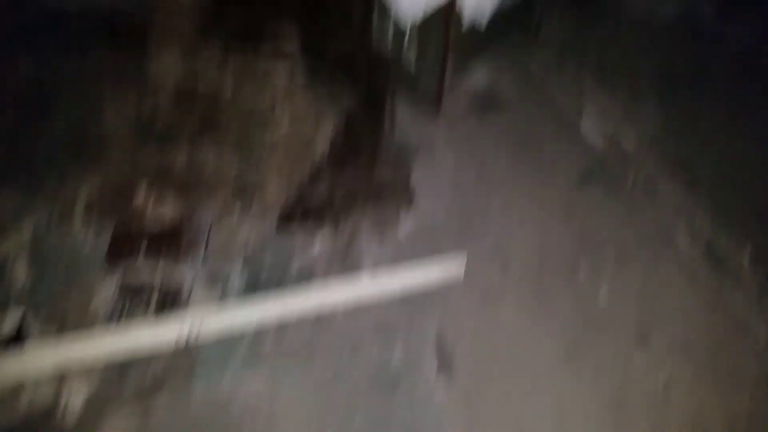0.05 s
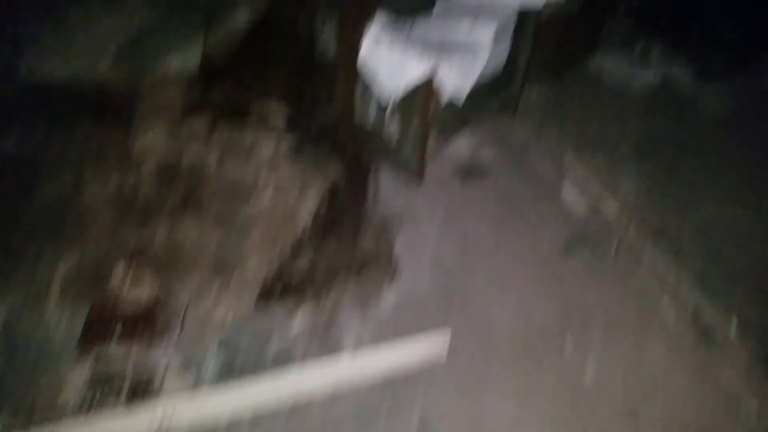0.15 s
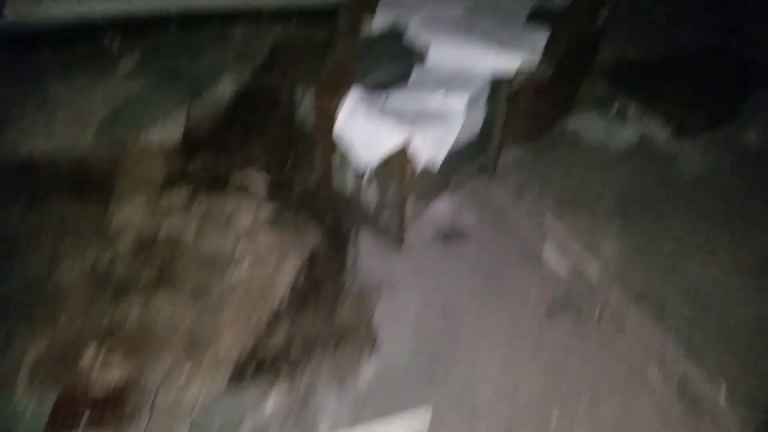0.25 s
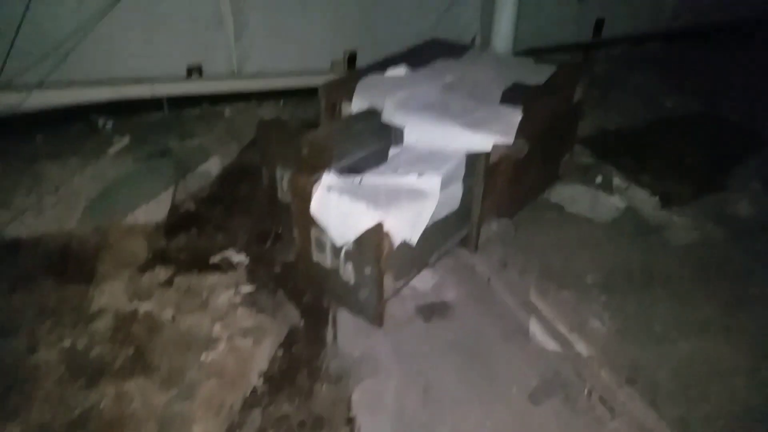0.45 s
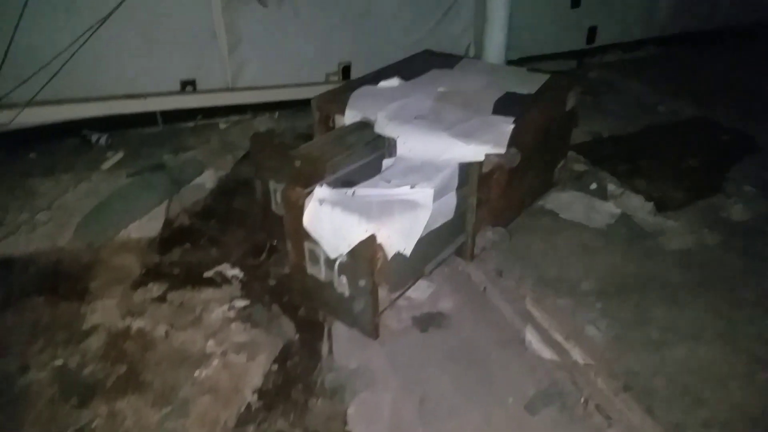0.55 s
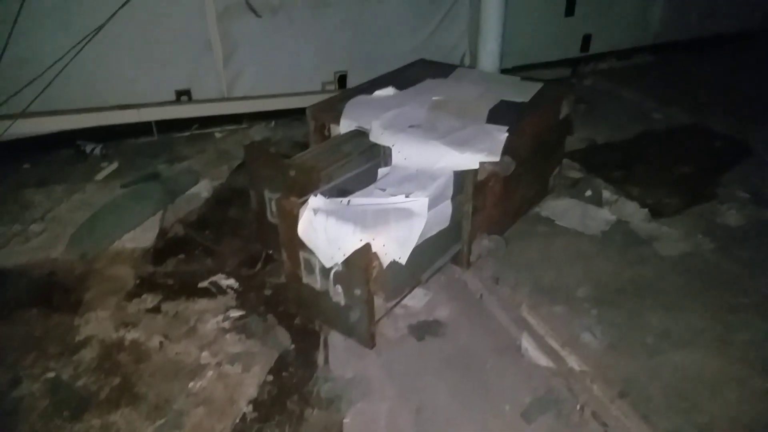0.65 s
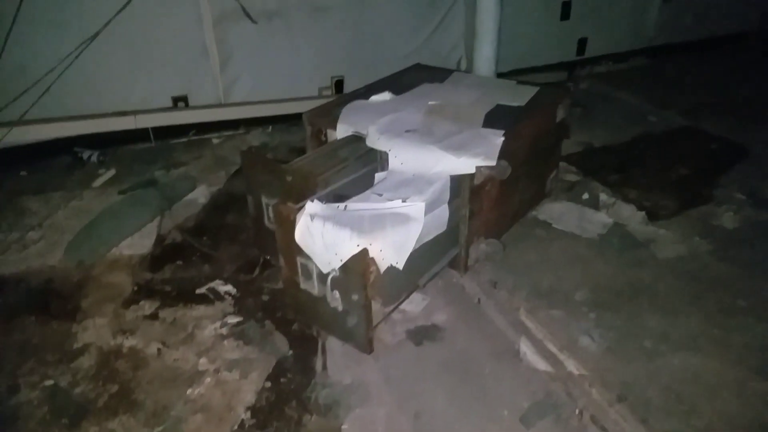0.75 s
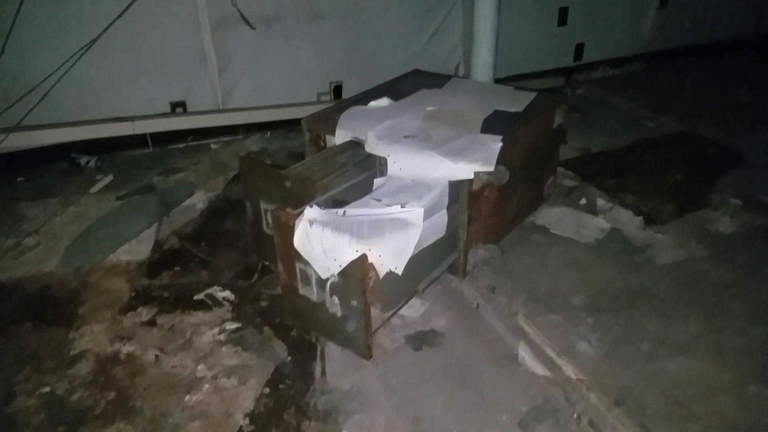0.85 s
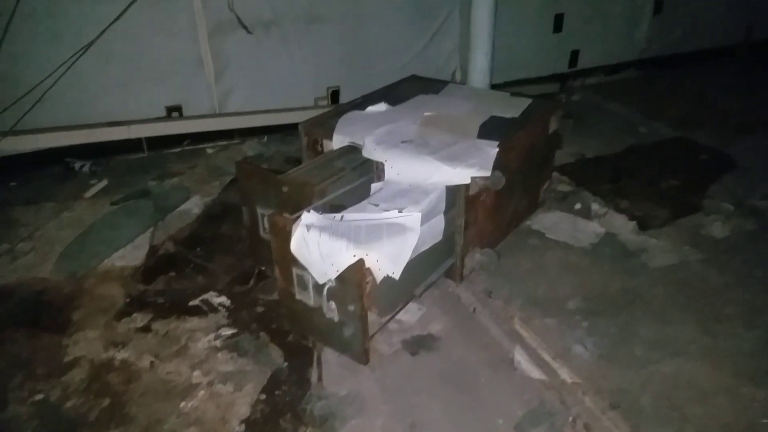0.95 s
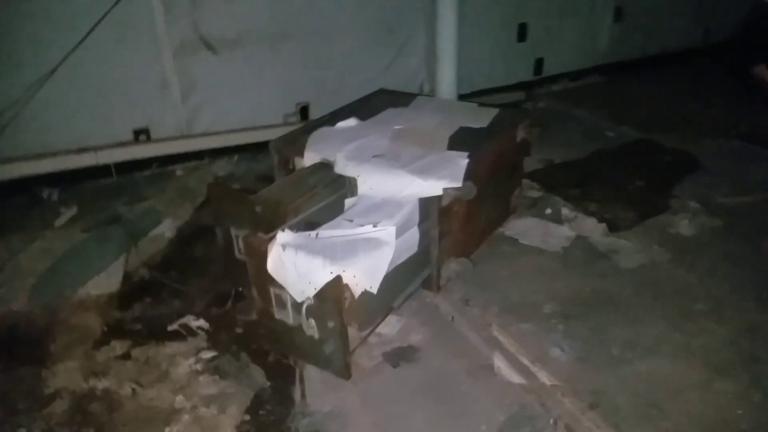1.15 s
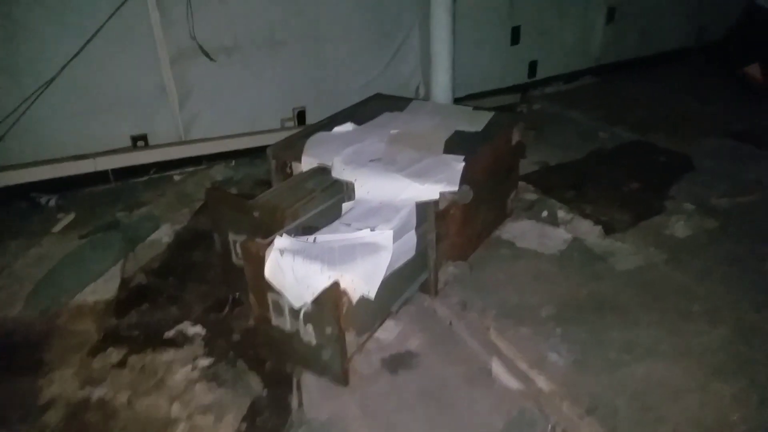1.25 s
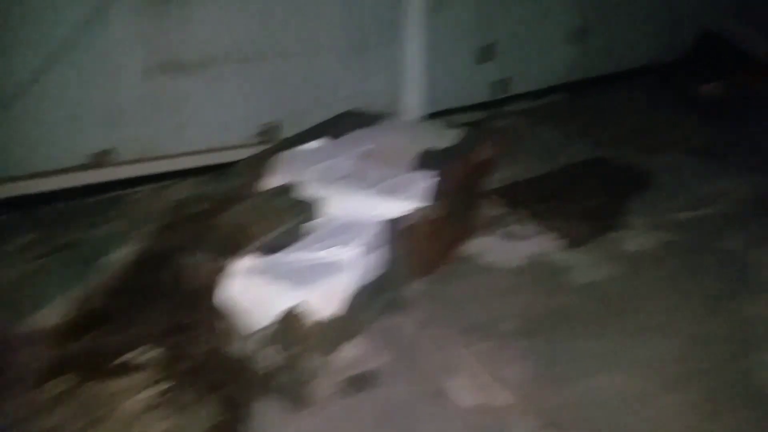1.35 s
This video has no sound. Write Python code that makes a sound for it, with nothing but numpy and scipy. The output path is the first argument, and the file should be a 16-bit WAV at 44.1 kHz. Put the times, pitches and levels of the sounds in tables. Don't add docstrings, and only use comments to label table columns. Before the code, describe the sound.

One footstep crushes brittle shards on concrete with sharp cracks and a short gritty scrape, echoing through a bare hall; sparse ticks follow over low hum and hiss, with a late handling tap and rub on the left.

```python
import sys
import numpy as np
from scipy import signal
from scipy.fft import rfft, irfft
from scipy.io import wavfile
from scipy.ndimage import uniform_filter1d

SR = 44100
rng = np.random.default_rng(int(sys.argv[2]) if len(sys.argv) > 2 else 0)


def to_linear_factor(level_db):
    exponent = np.asarray(level_db, float) / 20
    return 10 ** exponent


def store_pcm(level_fs):
    pcm = np.round(np.clip(level_fs, -1, 1) * 32767).astype(np.int16)
    wavfile.write(sys.argv[1], SR, np.atleast_2d(pcm).T)


N = 61739


def evened(x):
    return x / np.sqrt(np.mean(x ** 2) + 1e-20)


def read(points, hz):
    f, value = np.transpose(points)
    return np.interp(np.log(hz + 1), np.log(f + 1), value)


def add(mix, s, sound):
    part = mix[..., round(s * SR):][..., :sound.shape[-1]]
    part += sound[..., :part.shape[-1]]


def coloured(x, points, tilt_db=0.):
    hz = np.fft.rfftfreq(x.shape[-1], 1 / SR)
    gain_db = read(points, hz) + tilt_db * np.log2(hz / 3000 + 0.043)
    return irfft(rfft(x) * to_linear_factor(gain_db), x.shape[-1])


def resonate(x, hz, width_hz):
    return signal.lfilter(*signal.iirpeak(hz, hz / width_hz, SR), x)


def steep(x, hz, width_hz):
    return evened(resonate(resonate(x, hz, width_hz), hz, width_hz))


def below(x, edge_hz):
    lowpass = signal.firwin(255, edge_hz, window=("kaiser", 9), fs=SR)
    return signal.oaconvolve(x, lowpass[None], "same")


def above(x, order, edge_hz):
    return signal.sosfilt(signal.butter(order, edge_hz, "high", fs=SR, output="sos"), x)


def placed(x, pan_db, lag_s):
    hz = np.fft.rfftfreq(x.shape[-1], 1 / SR)
    side = np.array([[1.], [-1.]])
    turn = np.exp(-1j * np.pi * hz * lag_s * side)
    return irfft(rfft(x) * turn, x.shape[-1]) * to_linear_factor(np.minimum(side * pan_db, 0))


def pair(same, size):
    a, b = rng.standard_normal((2, size))
    same = np.clip(same, 0, 1)
    return np.array([a, same * a + np.sqrt(1 - same ** 2) * b])


def ring(s, db, hz, ring_s):
    t = np.maximum(np.arange(N) / SR - s, 0)
    return to_linear_factor(db) * t / ring_s * np.exp(1 - t / ring_s) * np.sin(2 * np.pi * hz * t)


def air():
    # f/Hz, level/dB
    spectrum = [(12, -56), (20, -18.5), (305, -13), (440, -12.5), (994, -22), (2060, -16.5), (2660, -26),
                (14700, -38), (16500, -41)]
    # f/Hz, likeness/1
    likeness = [(60, 0.94), (180, 0.92), (550, 0.55), (1650, -0.22), (4970, -0.022), (15000, -0.014)]
    # f/Hz, left over right/dB
    balance = [(60, 8), (380, -1), (2380, 8.5), (15000, -2)]
    # f/Hz, width/Hz, level/dB
    hum = [(53, 31, -67.5), (99.2, 14.6, -67.5), (142, 8.8, -77.5), (328, 13, -74)]
    hz = np.fft.rfftfreq(N, 1 / SR)
    a, b = rfft(rng.standard_normal((2, N)))
    same = np.clip(read(likeness, hz), 0, 1)
    half_pan_db = read(balance, hz) / 2
    left = a * to_linear_factor(half_pan_db)
    right = (same * a + np.sqrt(1 - same ** 2) * b) * to_linear_factor(-half_pan_db)
    out = to_linear_factor(-58.5) * evened(irfft(np.array([left, right]) * to_linear_factor(read(spectrum, hz)), N))

    calm_db = -3 * np.clip((np.arange(N) / SR - 0.46) / 0.056, 0, 1)
    for f, width_hz, db in hum:
        level_db = db + calm_db * (f == hum[1][0])
        out = out + to_linear_factor(level_db) * steep(pair(0.97, N), f, width_hz)
    return out + to_linear_factor(-68) * steep(pair(0.71, N), 1920, 1070)


def earlier_step():
    # f/Hz, level/dB
    spectrum = [(59, -32), (100, -11), (595, -8), (801, -12.5), (1720, -14.5), (1870, -13), (2040, -12.5),
                (2470, -18.5), (16000, -48.5)]
    level_db, t60_s, pan_db = -47.5, 0.73, 0.5
    fade = to_linear_factor(level_db - 60 * np.arange(N) / SR / t60_s)
    return placed(evened(coloured(pair(0.4, N), spectrum)) * fade, pan_db, 0)


def grit():
    grains_per_s, level_db, spread_db = 120, -72.5, 7
    size = to_linear_factor(level_db + spread_db * np.minimum(rng.exponential(1, N), 2))
    size = size * (rng.random(N) < grains_per_s / SR)
    kind = rng.integers(0, 8, N)
    out = np.zeros((2, N))
    for k, hz in enumerate(np.geomspace(700, 7000, 8)):
        sides = to_linear_factor(np.array([[3.], [-3.]]) * (-1) ** k)
        out += resonate(size * (kind == k), hz, 0.26 * hz) * SR / hz * sides
    return out


def taps():
    # t/s, peak/dB, f/Hz, ring time/s, left over right/dB
    modes = [(0.1710, -18, 2990, 0.0002, 26), (.1709, -39, 12500, .0001, 20), (.1709, -34, 6500, .0001, 20),
             (0.1709, -29, 1450, 0.0004, 15), (0.1722, -43, 520, 0.0008, 1),
             (1.1948, -17, 7500, 0.0001, 33), (1.1944, -21.5, 3250, 0.0003, 12),
             (1.1948, -19, 1950, 0.0004, 10), (1.1947, -24, 5000, .00012, 20),
             (1.1949, -25.5, 720, 0.0007, 8.5), (1.2140, -31, 480, 0.0009, 17),
             (1.2150, -35, 2600, .0003, 15), (.2360, -51, 65, .006, 0.5), (1.2130, -40.5, 149, 0.0032, 19),
             (1.2147, -28, 1300, 0.0004, 13)]
    return sum(placed(ring(*mode), pan_db, -0.00018) for *mode, pan_db in modes)


def snaps():
    onsets_s = [.2098, .2379, .2374, .2391, .2578, .2584, .2584, .2588, .3066, .3068, .3095, .3068, .3890,
                .3892, .3915, .3892, .4499, .4501, .4502, .4499, .4499, .4501, .5200, .8612, .2160, .2860,
                .2790, .4502, .4500, .4600, .2640, .3228, .3290, .3480, .3608, .3685, .4175, .3925, .8606,
                .8610, 1.1380, 1.1392, 1.1560, .1775, .1858, .2090, .2190, .2240, .4500, .2440, .2520,
                .3890, .3930, .3070, 1.1385]
    # peak/dB, f/Hz, ring time/s
    modes = [(-36, 3000, 0.00087), (-10.5, 2450, 0.00042), (-18.5, 1240, 0.00063), (-18.5, 727, 0.0012),
             (-12.5, 780, 0.0009), (-16, 1650, 0.0006), (-13.5, 3500, 0.00096), (-14.5, 2170, 0.00099),
             (-12, 2435, 0.00051), (-26.5, 1050, 0.0014), (-27, 2500, 0.0007), (-19, 3060, .0006),
             (-24, 2100, 0.00022), (-35, 1080, 0.0012), (-39, 2200, 0.0006), (-32, 3600, 0.00036),
             (-11, 3550, 0.00038), (-19.5, 2480, 0.00054), (-29, 770, 0.0012), (-17, 7000, 0.00045),
             (-21, 13200, .0003), (-28, 1240, 0.00059), (-45, 2160, .001), (-46.5, 700, 0.00099),
             (-40, 355, .005), (-37, 330, .0065), (-38, 490, .005), (-25, 1750, .0005), (-42, 490, .002),
             (-36, 7400, .0004), (-30, 4650, .0008), (-33, 2700, .0003), (-33, 2300, .0004),
             (-36, 4200, .0002), (-37, 2400, .0003), (-35, 2700, .0003), (-41, 2900, .0003),
             (-36, 1500, .0005), (-52, 1900, .0003), (-52, 4500, .0002), (-46, 1900, .0003),
             (-47, 4800, .00015), (-50, 5800, .0002), (-50, 2600, .0006), (-48, 2900, .0006),
             (-52, 14400, .0003), (-50, 14400, .0003), (-50, 13600, .0003), (-27, 15500, .0003),
             (-30, 3500, .0012), (-33, 2200, .001), (-41, 590, .002), (-36, 2550, .0006),
             (-41, 14200, .0003), (-46, 1100, .0006)]
    return [(s, ring(0, *mode)[:2048] * np.ones((2, 1))) for s, mode in zip(onsets_s, modes)]


def cracking():
    onsets_s = [.2085, .2185, .2292, .2580, .2630, .2810, .3066, .3888, .4498, .4530, .4592, .4655, .5110,
                .6345, .7440, .8610, 1.1375, 1.1555]
    # level/dB, length/s, brightness/(dB/octave)
    bursts = [(-38.5, 0.011, -4.2), (-36, 0.026, -5.5), (-31, 0.0035, 3), (-25, 0.0062, -2),
              (-19.5, 0.011, -2.5), (-39, 0.0035, -10), (-28.5, 0.0045, -2.5), (-34, 0.0054, -4),
              (-25, 0.0016, 5), (-30, 0.004, 2), (-32, 0.00346, 0.5), (-35, 0.0092, 3), (-40.5, 0.0083, -1),
              (-51.5, 0.0056, -2.5), (-49, 0.0052, -8), (-51, 0.0037, -4), (-55, .006, -2),
              (-56, 0.0044, 3)]
    # f/Hz, level/dB
    spectrum = [(180, -51), (300, -31), (587, 0.5), (892, -14), (2480, 10.5), (5460, -2.5), (7890, 3.5),
                (13000, -9), (16500, -26)]
    sounds = []
    for s, (db, length_s, tilt_db) in zip(onsets_s, bursts):
        u = np.arange(2048) / SR / length_s
        noise = evened(coloured(pair(0.28, 2048), spectrum, tilt_db))
        sounds.append((s, to_linear_factor(db) * noise * np.minimum(u * 12, 1) * np.exp(-2.5 * u ** 2)))
    return sounds


def grinding():
    # t/s, level/dB, length/s, squeal/dB
    drags = [(0.2293, -20.5, 0.0045, -17), (0.2630, -14.5, 0.0079, -12.5)]
    # f/Hz, width/Hz, level/dB
    body_modes = [(2205, 130, 1.8), (1724, 350, -5), (3580, 130, -9), (5020, 320, -11), (5500, 250, -11),
                  (710, 480, -11)]
    # f/Hz, width/Hz, level/dB
    squeal_modes = [(14600, 430, -7.8), (12010, 580, -6), (13000, 700, -11)]
    sounds = []
    for s, db, length_s, squeal_db in drags:
        slips = pair(0.44, 4096)
        body = evened(sum(to_linear_factor(g) * steep(slips, f, 1.84 * w) for f, w, g in body_modes))
        squeal = evened(sum(to_linear_factor(g) * steep(slips, f, 0.62 * w) for f, w, g in squeal_modes))
        settled = (body + to_linear_factor(squeal_db) * squeal)[:, 2048:]
        u = np.clip(np.arange(2048) / SR / length_s, 0, 1)
        sounds.append((s, to_linear_factor(db) * settled * np.sin(np.pi * u ** 1.03) ** 0.88))
    return sounds


def place(s):
    # from t/s, left late by/s, left over right/dB, hall send/dB
    places = [(.175, -.0001, 2.5, 6), (.228, -.00006, 3.5, 4), (.2362, .00007, -1.5, 9.8),
              (.2388, .00001, -.6, 6.5), (.2565, -.00001, 1.5, -2.5), (.2612, -.00004, -1.5, -4.6),
              (.3, .00001, 1.4, -19), (.38, .00009, -1, -13), (.44, .00005, -2.4, -11),
              (.6, .00002, 1.5, 5), (1.1, -.0001, 21, -8)]
    return [row for row in places if row[0] <= s][-1][1:]


def debris():
    near, sent = np.zeros((2, N)), np.zeros(N)
    lead = 32
    for s, sound in snaps() + cracking() + grinding():
        lag_s, pan_db, send_db = place(s)
        add(near, s - lead / SR, placed(np.pad(sound, [(0, 0), (lead, 0)]), pan_db, lag_s))
        add(sent, s, to_linear_factor(send_db) * sound[0])
    return near, sent


def hall(x):
    # f/Hz, t60/s
    decay = [(300, 0.45), (700, 0.48), (1200, 0.62), (2200, 0.54), (5000, 0.65), (9000, 0.43),
             (14000, 0.57)]
    # f/Hz, level/dB
    spectrum = [(170, -30), (340, -2), (700, 3), (1100, 0.5), (2300, -1.5), (4500, 4), (6500, 4.5),
                (9000, 5.5), (14000, 1)]
    # f/Hz, left over right/dB
    balance = [(500, 2.5), (7000, -4), (13000, -1.5)]
    blur_hz, high_blur_hz, high_share, gap_s = 900, 3500, 0.7, 0.0013
    hz, t, z = signal.stft(x, SR, nperseg=256, noverlap=192)
    power = uniform_filter1d(abs(z) ** 2, round(blur_hz / hz[1]), 0)
    high = np.clip((hz[:, None] - 4500) / 2000, 0, 1) * high_share
    power = (1 - high) * power + high * uniform_filter1d(power, round(high_blur_hz / hz[1]), 0)

    fade = to_linear_factor(-120 * t / read(decay, hz)[:, None]) * np.clip(t / gap_s, 0, 1)
    power = signal.fftconvolve(power, fade / fade.sum(1)[:, None], axes=1)[:, :len(t)]

    noise = signal.stft(pair(0.13, N), SR, nperseg=256, noverlap=192)[2]
    noise = noise / np.sqrt(np.mean(abs(noise) ** 2))
    colour_db = read(spectrum, hz) + np.array([[.5], [-.5]]) * read(balance, hz)
    z = noise * np.sqrt(abs(power)) * to_linear_factor(colour_db)[:, :, None]
    return signal.istft(z, SR, nperseg=256, noverlap=192)[1][:, :N]


def echo_grain():
    span = round(0.003 * SR)
    flicker = uniform_filter1d(uniform_filter1d(pair(0.6, N), span), span)
    return evened(to_linear_factor(3.2 * evened(flicker)))


def rub():
    # f/Hz, level/dB
    spectrum = [(120, -30), (200, -2), (491, -23), (590, -12), (1370, -2.5), (5230, -4), (16000, -30.5)]
    start_s, rise_s, length_s = 1.192, 0.026, 0.088
    level_db, fade_db, pan_db = -41, -13.5, 22
    t = np.arange(N) / SR - start_s
    shape = np.clip(t / rise_s, 0, 1) * np.clip((length_s - t) / 0.011, 0, 1)
    shape = shape * to_linear_factor(level_db + fade_db * np.clip(t / length_s, 0, 1))
    return placed(evened(coloured(pair(0.17, N), spectrum)) * shape, pan_db, 0)


def scene():
    crush_edge_hz, near_edge_hz, faint_edge_hz = 15350, 16700, 15650
    low_cut_hz, shoe_cut_hz, crush_end_s = 310, 420, 0.44
    (feet, sent), hand, fine = debris(), taps(), grit()
    wet = hall(to_linear_factor(-10) * (sent + fine[0]) + to_linear_factor(-19.5) * hand.mean(0))
    wet = above(wet, 6, low_cut_hz)
    feet = above(above(feet, 6, low_cut_hz), 2, shoe_cut_hz)
    crushing = np.arange(N) < crush_end_s * SR
    feet = np.where(crushing, below(feet, crush_edge_hz), below(feet, near_edge_hz))
    hand = below(hand, near_edge_hz - 500)
    tail = below(wet * echo_grain(), crush_edge_hz)
    faint = below(fine + rub() + earlier_step() + air(), faint_edge_hz)
    return feet + hand + tail + faint


def roll_off(x):
    return signal.sosfilt(signal.butter(12, 17000, fs=SR, output="sos"), x)


def record(dry):
    # f/Hz, level/dB
    response = [(7500, -0.18), (8800, -2.5), (10500, 1), (12000, 4.3), (15000, 8)]
    mix = coloured(dry, response) - 0.001
    return roll_off(mix)


dry = scene()
out = record(dry)
store_pcm(out)
```